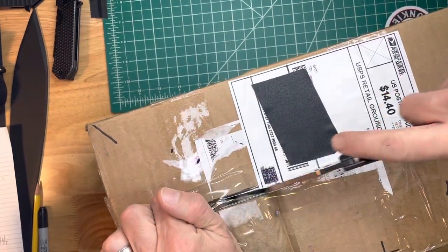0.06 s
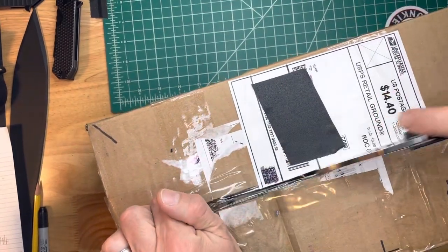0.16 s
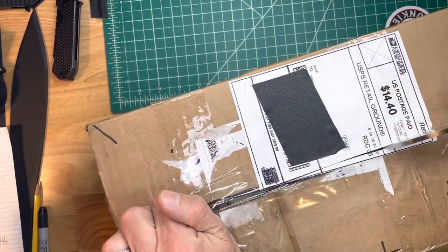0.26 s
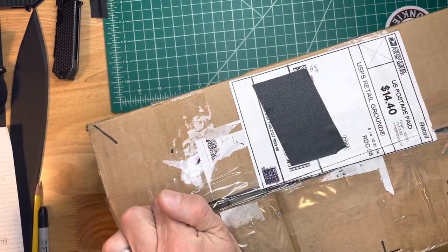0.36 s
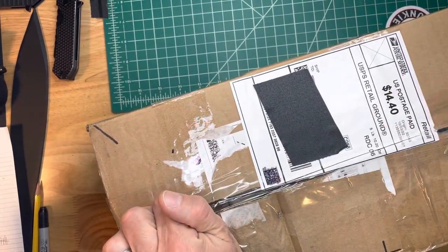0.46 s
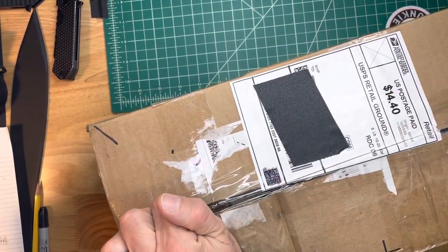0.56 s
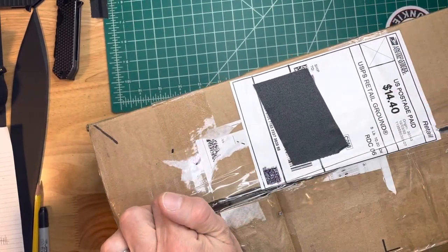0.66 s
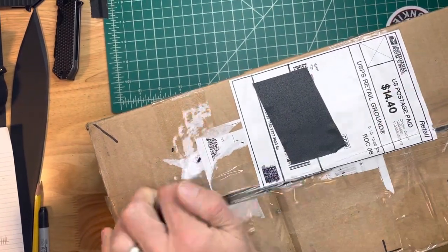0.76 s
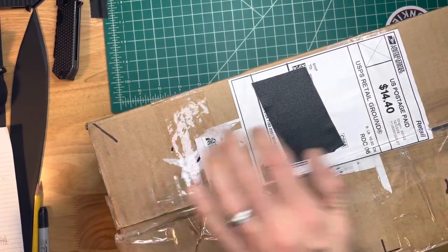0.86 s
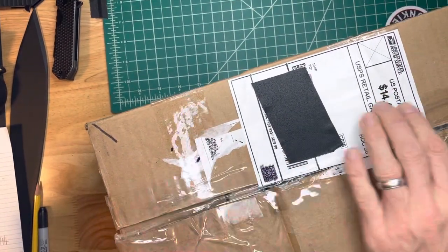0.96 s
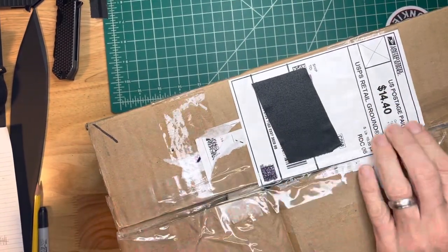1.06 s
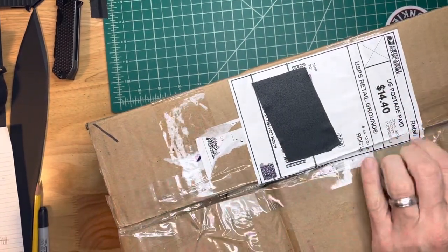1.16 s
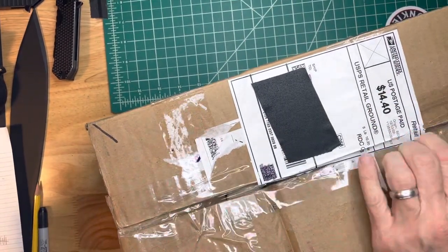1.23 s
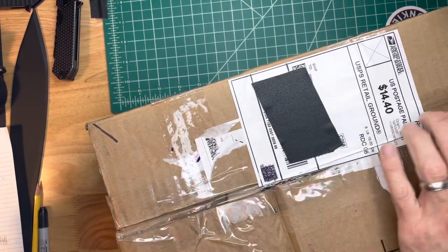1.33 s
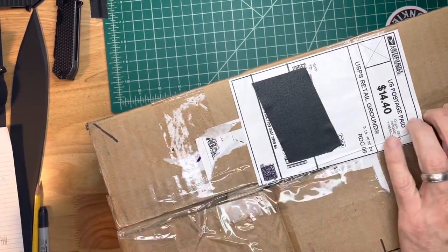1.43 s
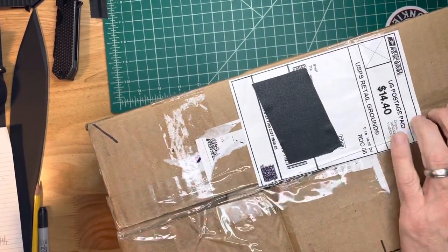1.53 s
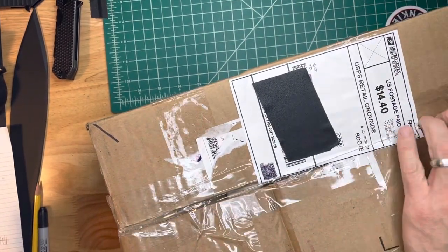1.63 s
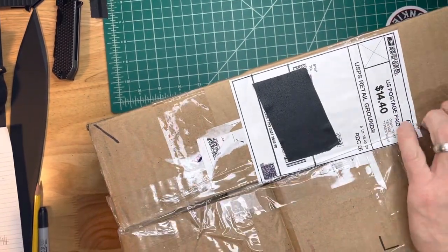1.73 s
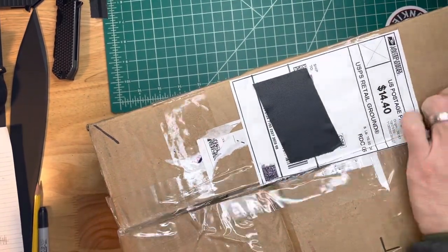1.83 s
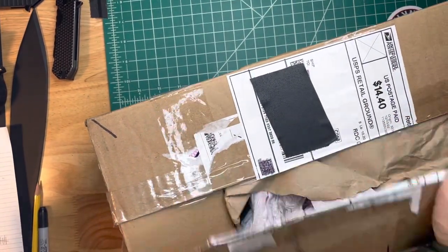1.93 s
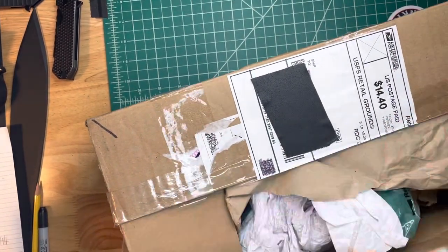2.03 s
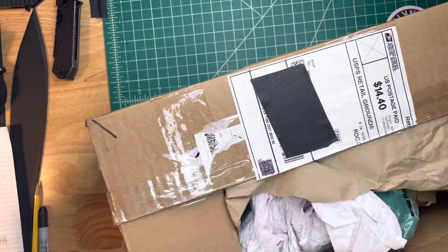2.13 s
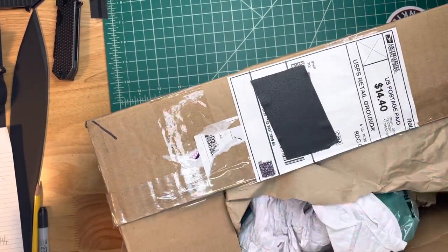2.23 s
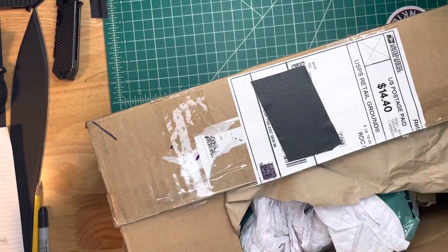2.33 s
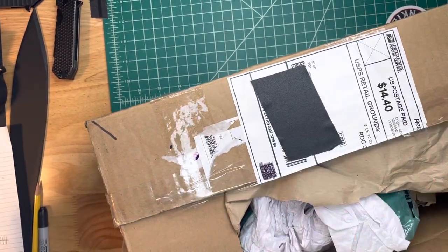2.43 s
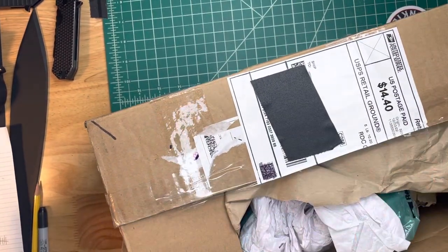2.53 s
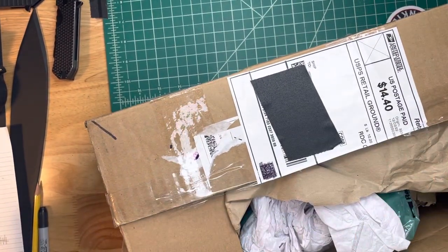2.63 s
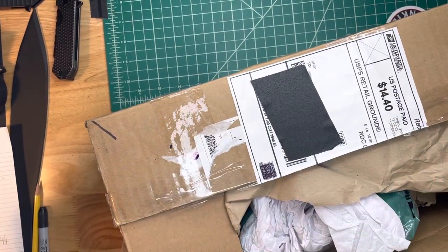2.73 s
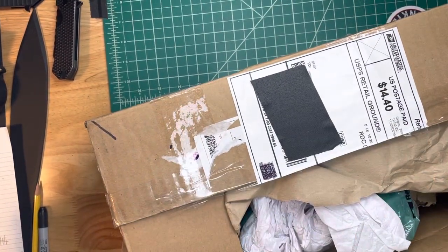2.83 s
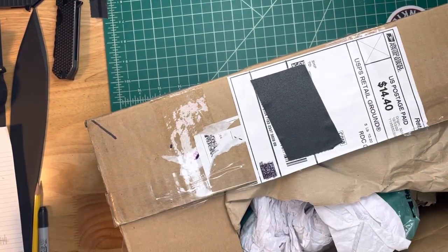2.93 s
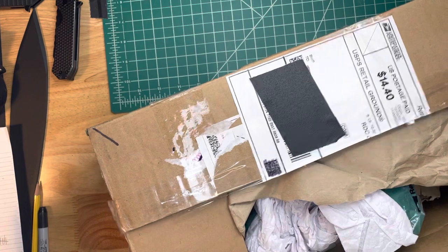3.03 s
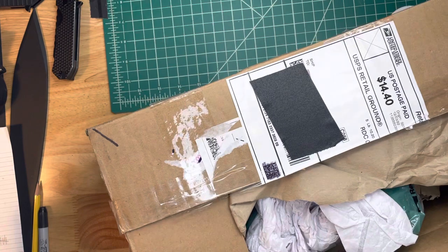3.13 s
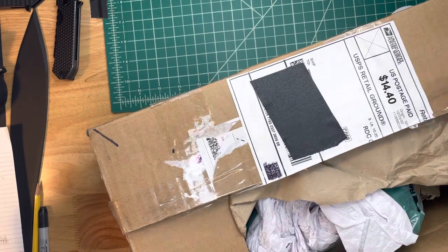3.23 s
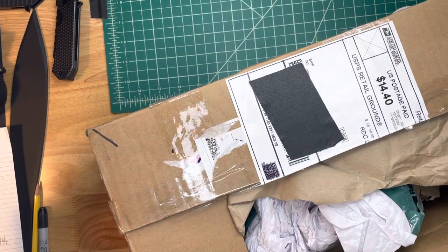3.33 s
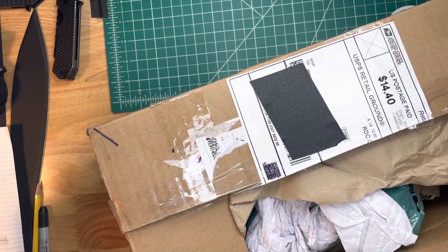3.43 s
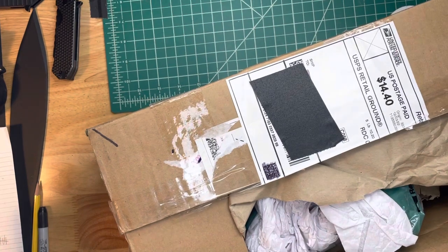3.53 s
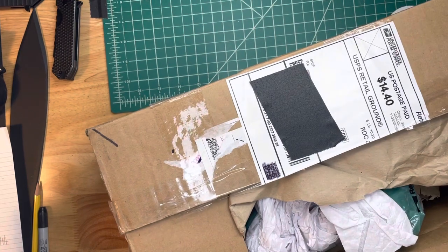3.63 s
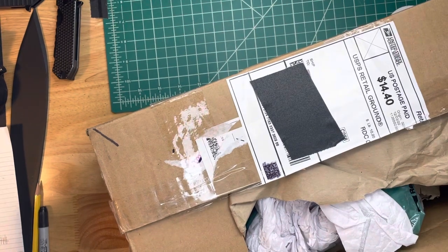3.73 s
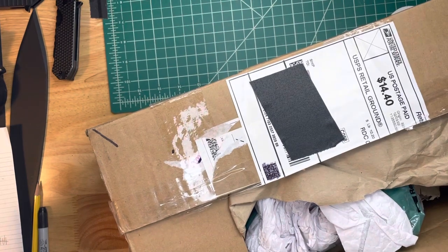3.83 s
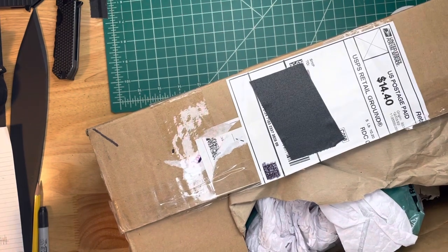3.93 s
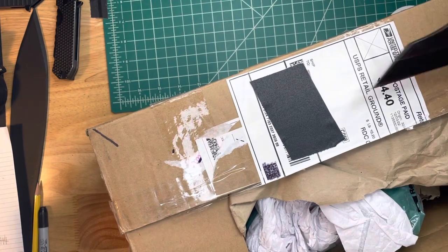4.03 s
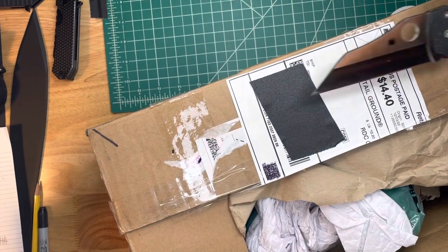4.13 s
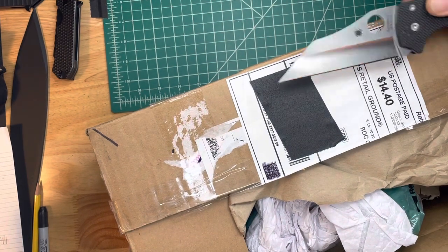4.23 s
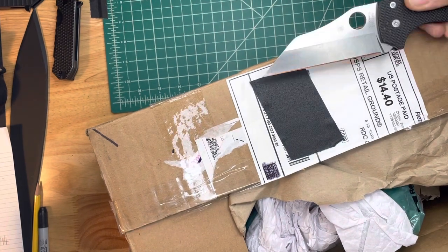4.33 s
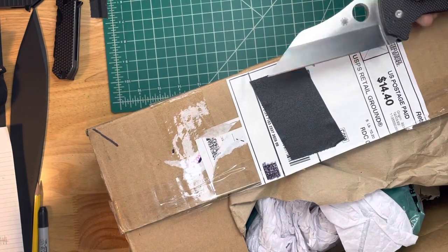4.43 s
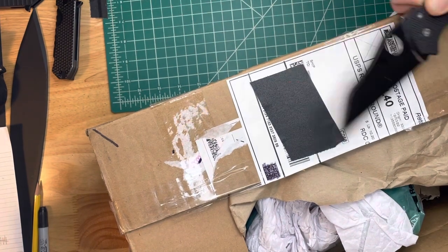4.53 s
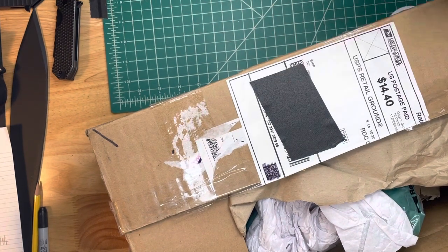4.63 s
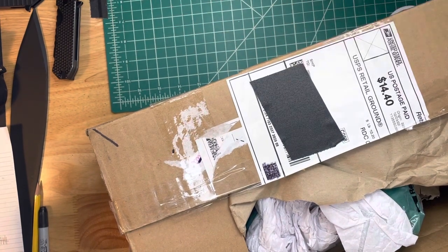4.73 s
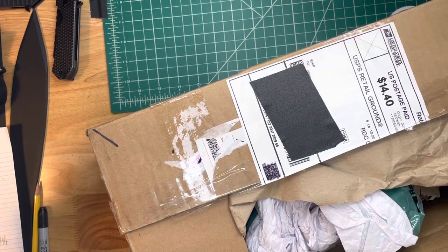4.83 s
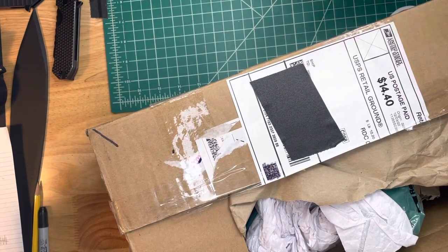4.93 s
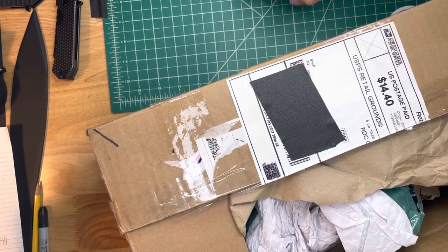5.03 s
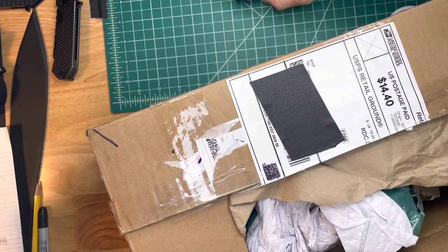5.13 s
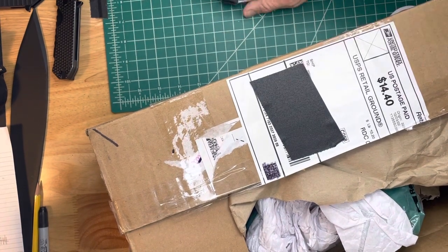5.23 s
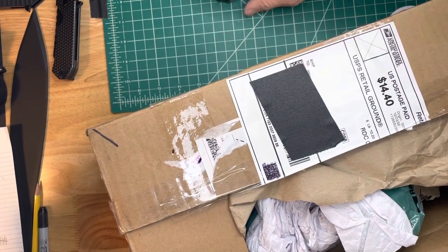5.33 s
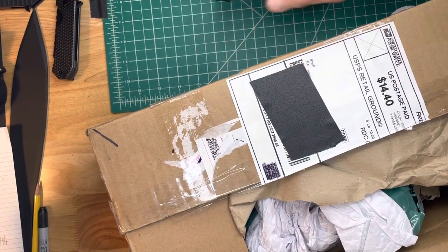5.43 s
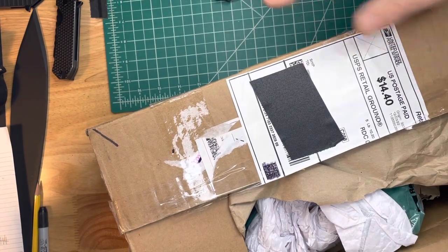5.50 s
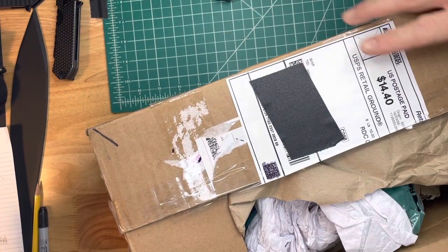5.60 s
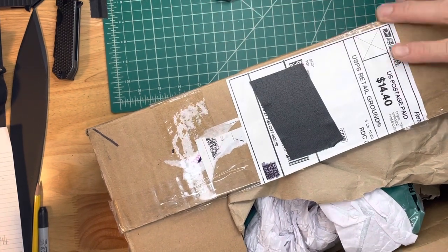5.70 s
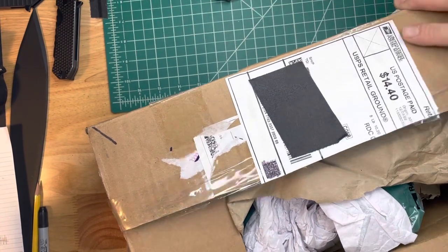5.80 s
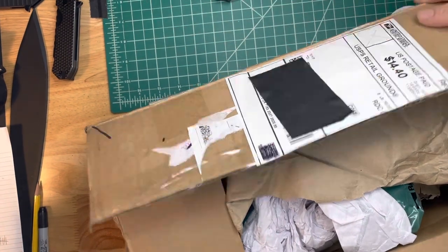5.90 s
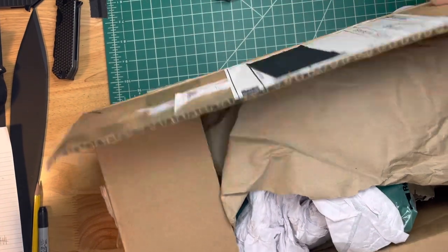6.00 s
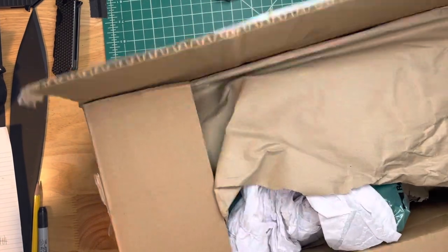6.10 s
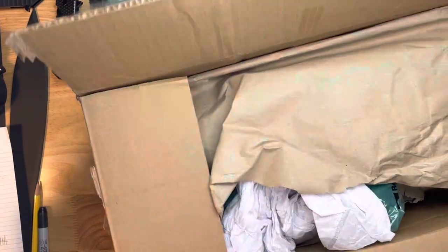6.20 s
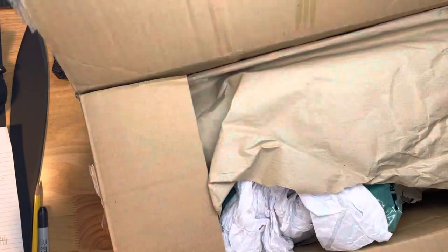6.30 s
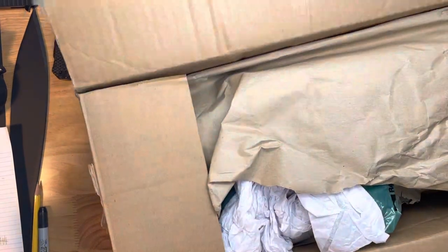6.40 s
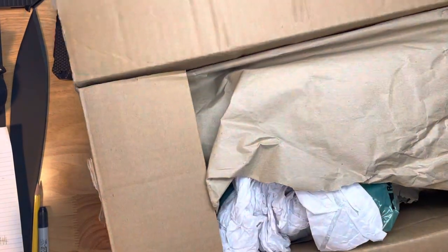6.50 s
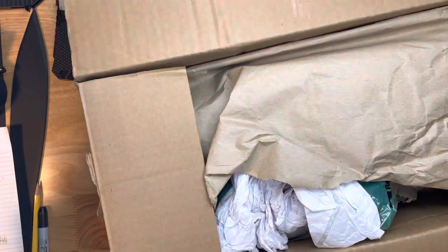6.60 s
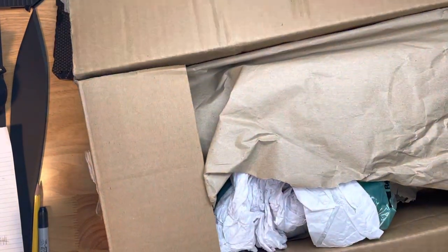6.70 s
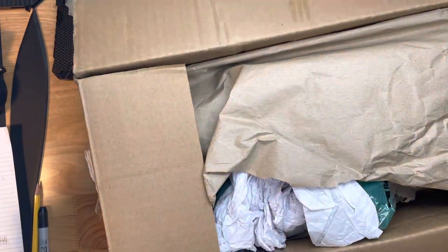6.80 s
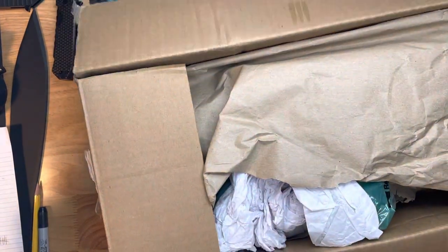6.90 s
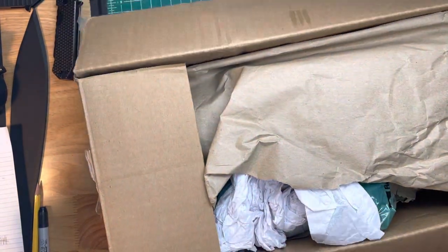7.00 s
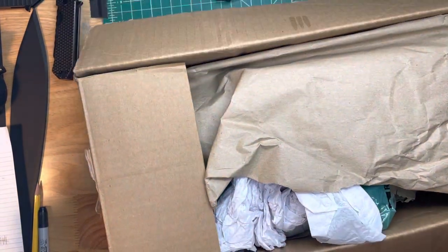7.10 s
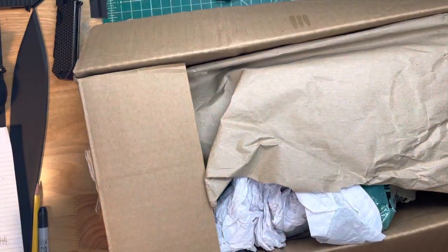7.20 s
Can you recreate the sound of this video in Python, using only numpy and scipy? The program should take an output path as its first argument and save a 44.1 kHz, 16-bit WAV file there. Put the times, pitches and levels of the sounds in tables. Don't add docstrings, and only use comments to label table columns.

```python
import sys
import numpy as np
from scipy import signal
from scipy.fft import rfft, irfft, next_fast_len
from scipy.io import wavfile
from scipy.ndimage import uniform_filter1d, map_coordinates

SR = 44100
rng = np.random.default_rng(int(sys.argv[2]) if len(sys.argv) > 2 else 0)


def int16_out(signal):
    q = np.round(np.clip(np.atleast_2d(signal).T, -1, 1) * 32767)
    wavfile.write(sys.argv[1], SR, q.astype(np.int16))


def field_ratio(decibels):
    return 10 ** (np.asarray(decibels, dtype=float) / 20)


N = 319749


def unit(x):
    return x / np.sqrt(np.mean(x ** 2) + 1e-20)


def along(points, hz):
    f, value = np.transpose(points)
    return np.interp(np.log(hz + 1), np.log(np.abs(f) + 1), value)


def filtered(x, response):
    size = next_fast_len(N + SR // 2)
    hz = np.fft.rfftfreq(size, 1 / SR)
    return irfft(rfft(x, size) * response(hz), size)[..., :N]


def resonant(x, modes):
    def response(f):
        total = 0
        for k, (hz, width, db) in enumerate(modes):
            damping = 1j * f * width
            total = total + (-1) ** k * field_ratio(db) * damping / (hz * hz - f * f + damping)
        return total
    return filtered(x, lambda f: np.interp(f, f[::16], response(f[::16])))


def coloured(x, spectrum):
    low, high = spectrum[0][0], spectrum[-1][0]
    return filtered(x, lambda hz: field_ratio(along(spectrum, hz)) * (hz > low) * (hz < high))


# pitch in Hz, width in Hz, level in dB.
FLAP_MODES = [(401.2, 135, 3.5), (456.5, 153.5, 6), (551, 51.7, 5), (699, 78.4, 3), (883, 60, -2),
              (1050, 46, -10.5)]
# pitch in Hz, level in dB per Hz.
SNAP_EDGE = [(2500, -13.5), (5500, -1), (8000, 0.5), (10000, -7), (15900, -10), (16800, -40)]


def snaps(rows):
    centres, edges, kicks = np.zeros((3, N + SR))
    t = np.arange(SR // 8) / SR
    fade = .12 * field_ratio(-60 * t / .06) + field_ratio(-60 * t / .011)
    release = 1.7 * np.exp(-t / .00008)
    for s, db, knock_db, hz, edge_db in rows:
        fizz = rng.standard_normal((3, len(t))) * fade
        fizz *= np.linalg.norm(fade) / np.linalg.norm(fizz, axis=1, keepdims=True)
        burst = fizz + release
        start = round(s * SR)
        at = slice(start, start + len(t))
        centre = signal.iirpeak(min(hz, 15000), 3.5, SR)
        centres[at] += field_ratio(db + 6.5) * signal.lfilter(*centre, burst[0])
        edges[at] += field_ratio(db + edge_db + 6.5) * burst[1]
        kicks[at] += field_ratio(db + knock_db + 13) * burst[2]
    return centres[:N] + coloured(edges[:N], SNAP_EDGE) + resonant(kicks[:N], FLAP_MODES)


# start in seconds, peak in dB, box knock in dB, centre in Hz, bright edge in dB.
TAPE_SLITS = [(0.009, -17, -1.5, 2130, -10), (0.0753, -15, -9, 1400, -10), (0.141, -19, -5, 3320, -15),
              (0.1945, -14.5, -7, 1820, -12), (0.3424, -26.5, 0, 1780, -1), (0.562, -37.5, -23, 6540, 2.5),
              (0.6295, -29.5, -6, 1340, -7.5), (0.669, -19.5, -6, 1180, -10.5),
              (0.7112, -27.5, -49, 1610, -18), (0.7453, -39, -7.5, 1710, -7.5),
              (0.7609, -21, -13, 1810, -3)]
# start in seconds, peak in dB, box knock in dB, centre in Hz, bright edge in dB.
TAPE_TEARS = [(0.962, -35.5, -1, 1510, -8), (1.101, -32.5, -1, 2330, -4), (1.1361, -5, -18, 1100, -21.5),
              (1.2516, -34, 0, 2270, -28), (1.302, -28, -1, 1080, -16), (1.331, -26.5, -5, 1210, -15),
              (1.551, -31, 0, 1240, -0.5), (1.6294, -13, -14, 1670, -14), (1.678, -23, 1.5, 1140, -5.5),
              (1.756, -19, -9.5, 1745, -6.5), (1.819, -15.5, -7.5, 1552, -11.5),
              (1.8569, -12, -2, 1685, -4), (1.8711, 2, -4, 1650, -15.5), (1.8975, -7.5, -8, 1810, -8.5)]
# start in seconds, peak in dB, box knock in dB, centre in Hz, bright edge in dB.
PAPER_CREASES = [(2.2269, -30.5, -22, 2030, -18.5), (2.4697, -36.5, -2.5, 2330, -11.5),
                 (2.61, -40.5, -3, 5060, -1.5), (2.832, -31.5, -13.5, 1190, -16.5),
                 (2.937, -34, -13.5, 5960, -20.5), (3.1831, -30.5, -10.5, 2350, -4),
                 (3.190, -24.5, 5, 1110, -11.5), (3.252, -10, 1, 1210, -9), (3.406, -23.5, 4.5, 2210, -15),
                 (3.4286, -18.5, 7, 1730, -9.5), (3.457, -34.5, -12.5, 1755, 3)]
# start in seconds, peak in dB, box knock in dB, centre in Hz, bright edge in dB.
KNIFE_AND_FLAP_CLICKS = [(4.145, -34, -14, 5850, 0), (4.4793, -26.5, -1, 1990, -2),
                         (4.5102, -33.5, 5, 1740, -20), (4.5606, -35, 6.5, 10200, -4),
                         (4.66, -17.5, -32, 3300, 4), (5.084, -28.5, -8, 1240, -50),
                         (5.2289, -22.5, 4.5, 1700, -6.5), (5.2697, -24, 0, 1170, -7),
                         (5.2979, -4.5, -9, 1300, -19), (5.3359, -6.5, -30, 1240, -20),
                         (5.395, -20, -11, 1130, -14.5), (5.673, -27, 1, 5300, -30),
                         (5.8488, -27, -2.5, 2200, -5), (5.874, -7.5, -6.5, 2070, -8),
                         (6.1562, -41, -25, 6100, -0.5)]


def tape_paper_and_knife():
    return snaps(TAPE_SLITS + TAPE_TEARS + PAPER_CREASES + KNIFE_AND_FLAP_CLICKS)


# start in
# seconds, peak in dB, box knock in dB, centre in Hz, bright edge in dB.
SMALL_TICKS = [(0.0323, -18, -4, 1510, -9), (0.3212, -33.5, -16, 1700, -8), (0.3584, -28, -12, 1250, -3.5),
               (0.415, -24, -12, 1440, -6.5), (0.5004, -38, -14, 2190, -9.5),
               (0.5726, -31.5, -18, 1210, -3.5), (0.634, -25, -10, 2150, -12.5),
               (0.9722, -23, -13, 1410, -16), (0.9921, -36, -9, 1770, -7.5), (1.2724, -32, -24, 1860, -7),
               (1.707, -29, -8, 1250, -10), (1.8135, -23.5, -11, 5600, -6), (2.1326, -33.5, 1.5, 1890, -12),
               (2.9604, -31, -14.5, 1210, -11.5), (2.9915, -24.5, -5, 2350, -13),
               (3.1966, -18.5, -17, 2300, -11.5), (4.6563, -15, -16, 5430, -1),
               (4.6724, -24, -15, 5830, -6.5), (4.9097, -44, -12, 1220, 0), (5.0764, -43, -6, 1230, -16.5),
               (5.3594, -27.5, -14, 1200, -8.5), (6.1032, -52.5, -30, 11000, -5),
               (6.2447, -48, -20, 1510, -12), (6.4124, -39.5, -4, 2060, -7), (6.9366, -41.5, -10, 1220, -7),
               (7.0744, -34, -12, 1720, -15), (7.1322, -37.5, -14, 3500, -31),
               (.278, -34.5, -30, 9000, 1),
    (.31, -40, -30, 9000, -3),
    (1.862, -24, -29.5, 5200, -6),
    (3.0812, -35, -30, 1500, -30.5),
    (4.5254, -32, 10, 4600, -8),
    (5.2742, -30.5, -20, 5600, -9.5),
    (5.3014, -18, -30, 5740, -9.5),
    (5.3294, -30.5, -20, 5400, -7),
    (6.4154, -42.5, -30, 8300, 1),
    (6.4474, -55, -30, 8000, 0.5),
]


def small_ticks():
    return field_ratio(-1.5) * snaps(SMALL_TICKS)


# pitch in Hz, width in Hz, level in dB.
PANEL_MODES = [(153.5, 22, 1), (247.1, 20.8, 2.5), (312.3, 59.5, -4.5), (395, 46, -2.5)]
# start in seconds, peak in dB, pitch in Hz, rattle in dB.
SOFT_BLOWS = [(0.271, -14, 292, -5), (0.444, -8, 365, 0.5), (0.669, -11.5, 385, 11), (0.966, -17, 144, -10),
              (1.138, -22, 101, 12), (1.41, -23.5, 67.7, 6.5), (1.632, -18, 280, -17),
              (1.774, -17.5, 255, 8), (1.865, -9.5, 164, -18.5), (1.882, -14, 72.4, -4),
              (1.913, -37, 83.4, -9), (2.838, -9, 163, -7), (2.975, -3.5, 180, -27), (3.178, -8, 185, 7),
              (3.2599, -1, 195, -13.5), (3.462, -17, 166, -14), (4.515, -28.5, 101, 4),
              (4.557, -29.5, 67.7, -3), (5.233, -30.5, 248, 13.5), (5.289, -40, 249.6, -20),
              (5.398, -42, 82.4, -16), (5.881, -0.5, 380.3, -15.5), (5.891, -10.5, 260, -24),
              (6.25, -30, 85, -1.5), (6.329, -28, 104, -6), (6.518, -27.5, 111, -8), (6.607, -31, 83, 4.5),
              (6.913, -37, 255, 4), (6.995, -33, 122, 10.5)]


def thumps():
    bends, puffs = np.zeros((2, N + SR))
    t = np.arange(SR // 3) / SR
    for s, db, hz, rattle_db in SOFT_BLOWS:
        start = round(s * SR)
        cycles = hz * t
        turn = 2 * np.pi * (.85 * cycles + 0.22 * (1 - np.exp(-cycles / 0.5)))
        swell = cycles ** 1.8 * np.exp(-cycles / 0.53)
        bends[start:][:len(t)] += field_ratio(db + 12.0) * swell * np.sin(turn)
        rattle = field_ratio(db + rattle_db + 13.5 - 60 * t / 0.029)
        puffs[start:][:len(t)] += rattle * rng.standard_normal(len(t))
    return bends[:N] + resonant(puffs[:N], PANEL_MODES)


# start in seconds, peak in dB,
# pitch in Hz, time to fall 60 dB in seconds.
BODY_RINGS = [(.009, -19, 730, 0.049), (0.031, -19, 300, .1), (.11, -23, 1010, .04),
              (.14, -20.5, 1050, 0.032), (0.194, -22.5, 1015, 0.03), (.243, -25, 300, .06),
              (.352, -21.5, 775, 0.06), (.395, -26.5, 764, 0.18), (0.423, -8, 301, 0.043),
              (.556, -29.5, 770, 0.039), (0.599, -23, 266, 0.16), (0.626, -20, 315, 0.13),
              (.676, -27, 1110, 0.034), (1.136, -26, 740, 0.041), (1.175, -23, 717, 0.05),
              (1.208, -30, 586, 0.032), (1.301, -22, 740, 0.026), (1.414, -34.5, 760, 0.048),
              (1.534, -28, 265.5, 0.12), (1.639, -22, 95, .12), (1.668, -19.5, 338, 0.059),
              (3.412, -22.5, 516, 0.086), (5.8735, -10.5, 2130, 0.015), (1.869, -14, 843, 0.12),
              (1.9, -26, 81, 0.094), (2.99, -13.5, 738, 0.029), (3.031, -28, 715, 0.036),
              (3.089, -26, 338, 0.075), (3.1, -18, 465, 0.12), (3.27, -16.5, 244, 0.24),
              (3.27, -22, 69.4, 0.18), (3.35, -32, 660, 0.052), (3.429, -16, 678, 0.052),
              (3.5, -34.5, 244.7, 0.18), (3.72, -51, 252, 0.29), (3.929, -49.5, 255, 0.2),
              (4.145, -50.5, 558, 0.19), (4.31, -52, 75.3, 0.27), (5.084, -32, 1242, 0.12),
              (5.17, -39, 940, 0.048), (5.205, -38, 1220, 0.037), (5.229, -31.5, 3010, .05),
              (5.229, -36, 1700, 0.048), (5.296, -19.5, 1231, 0.062), (5.884, -22, 241.3, 0.23),
              (5.885, -11.5, 329, 0.074), (5.886, -27, 489, 0.21), (5.892, -11, 57.6, 0.087),
              (6.356, -41, 2090, 0.065), (6.856, -45, 2670, 0.036),
              (2.9912, -23, 840, .031),
    (3.0962, -42, 2270, 0.1),
    (3.1182, -36.5, 2230, 0.083),
    (4.4822, -35, 800, 0.018),
    (4.5112, -38, 663, 0.062),
    (4.5602, -32.5, 620, .041),
    (5.8762, -14.5, 563, 0.028),
]


def rings():
    out = np.zeros(N + SR)
    t = np.arange(SR // 2) / SR
    for s, db, hz, t60 in BODY_RINGS:
        rise = 1 - np.exp(-hz * t / 0.73)
        out[round(s * SR):][:len(t)] += field_ratio(db - 60 * t / t60) * rise * np.sin(2 * np.pi * hz * t)
    return out[:N]


# start in seconds, peak in dB, last pitch in Hz.
FLAP_POPS = [(.197, -50, 304), (1.14, -26.5, 132), (1.631, -18, 189), (1.757, -22.5, 282),
             (1.774, -20, 221.7), (1.848, -18.5, 323), (1.861, -13, 403), (1.875, -18, 150.3),
             (5.229, -44, 338), (5.298, -28, 340), (5.397, -29, 241), (6.913, -37, 400), (6.998, -39, 340)]


def pops():
    out = np.zeros(N + SR)
    t = np.arange(SR // 2) / SR
    sweep, fall_s, life_cycles = 2.5, .003, 0.87
    for s, db, hz in FLAP_POPS:
        cycles = hz * (t + sweep * fall_s * (1 - np.exp(-t / fall_s)))
        life = hz * t / life_cycles
        out[round(s * SR):][:len(t)] += field_ratio(db) * np.e * life * np.exp(-life) * np.sin(2 * np.pi * cycles)
    return out[:N]


LAG_S = .008


def strokes(rows, rise_db_per_s, fall_db_per_s):
    t = np.arange(0, N + 64, 64) / SR - LAG_S
    s, hold, db = np.transpose(rows)[:3, :, None]
    rise = rise_db_per_s / (1 + (hold / .06) ** 2)
    before = np.maximum(s - t, 0)
    after = np.maximum(t - s - np.abs(hold), 0)
    return field_ratio(db - rise * before - fall_db_per_s * after)


def played(steady_db, curve, shapes, over_db):
    quick = np.sqrt(np.sum((shapes * field_ratio(over_db)[:, None]) ** 2, axis=0))
    quick = np.interp(np.arange(N), np.arange(len(quick)) * 64, quick)
    slow = field_ratio(np.interp(np.arange(N) / SR - LAG_S, np.transpose(curve)[0], steady_db))
    return np.hypot(slow, quick)


# time in seconds, pressure in dB, heft in dB (toward the desk, away from the flaps).
HAND_GRIP = [(0, -34.5, -7), (.66, -30, -5), (.74, -41, -1.5), (.92, -64, -8), (1.1, -45, -13),
             (1.5, -49, -7.5), (1.85, -48, -14), (2.3, -44.5, -10), (2.761, -67.5, -6), (3.601, -63, -7),
             (4.3, -64.5, -15), (4.55, -45.5, -13.5), (4.74, -63.5, -3.5), (4.86, -50, -4.5),
             (5.249, -57, -17.5), (5.52, -51.5, -6), (6.47, -50.5, -18.5), (7.25, -49.5, -12)]
# start in seconds,
# hold in seconds, panel level in dB, desk over it in dB, flaps over it in dB.
BOX_SHOVES = [(0, 0.053, -27, 0.5, -26), (0.355, 0.033, -25, -1, -6.5), (0.39, 0.046, -26, -15, -11),
              (0.583, 0.073, -30.5, -49, -28), (0.968, 0.015, -37.5, 7, 0), (1.133, 0.013, -37.5, 3, 6.5),
              (1.269, 0.071, -39.5, 2, -27), (1.354, 0.043, -51.5, 18, -8),
              (1.621, 0.0087, -26, -10.5, -10), (1.778, 0.013, -29, -3, -5),
              (1.863, 0.019, -10.5, -2.5, -5.5),
              (2.838, 0.038, -40, 4, -9), (2.95, 0.021, -20, 0, -4), (3, 0.12, -36, 0, -9),
               (3.081, 0.044, -20.5, -21.5, -17.5), (3.2, 0.044, -21, -21, 8),
               (3.253, 0.0044, -16, 3.5, -26), (3.31, 0.045, -37, -8, -0.5),
               (3.422, 0.042, -28.5, -2.5, -10), (3.93, 0.053, -57.5, -7, 1), (4.31, 0.035, -57, 4.5, 3),
               (4.9, 0.026, -51.5, 5, 4), (5.078, 0.011, -37, -3, -19.5), (5.29, 0.073, -28.5, -8.5, -1.5),
               (5.4, 0.0067, -32.5, 3.5, -4), (5.677, 0.017, -33, -5, -3), (5.881, 0.012, -29, 4, -7),
               (6.252, 0.01, -57, 17.5, -17), (6.53, 0.0077, -46.5, 5, 5), (6.929, 0.0058, -51, 9, 8),
               (6.995, 0.063, -51.5, 4, 6)]


def box_gains():
    shoves = np.array(BOX_SHOVES)
    _, press_db, heft_db = np.transpose(HAND_GRIP)
    desk_db, flap_db = shoves[:, -2], shoves[:, -1]
    heavy = strokes(shoves, 1100, 270)
    light = strokes(shoves, 1100, 420)
    shake = played(press_db + 3.5 + heft_db, HAND_GRIP, heavy, desk_db)
    drum = played(press_db, HAND_GRIP, heavy, 0 * desk_db)
    rub = played(press_db - 12 - heft_db, HAND_GRIP, light, flap_db)
    return shake, drum, rub


# time in seconds, motion in dB, dull over crisp in dB.
PAPER_STIR = [(0, -68, -6), (.3, -52, -12), (.76, -53.5, 5), (.94, -62.5, -9), (1.3, -53.5, -0.5),
              (1.51, -58, -2), (1.84, -42, 1.5), (2, -56, 0), (2.29, -50, -1), (2.8, -73.5, 4.5),
              (3.651, -68.5, -2.5), (4.199, -61.5, -10), (4.569, -45, -3), (4.64, -65, -12.5),
              (5.2, -51.5, 1), (5.6, -61.5, 2), (6.2, -72, 9), (7.12, -63, 8)]
# start in seconds, hold in seconds, crisp level in dB, dull over crisp in dB.
PAPER_CRUMPLES = [(.01, 0.04, -32, 0), (0.084, 0.069, -38, 3), (0.222, 0.043, -43, -2),
                  (0.444, 0.079, -43.5, 0), (0.19, 0.0045, -34.5, 0.5), (0.333, 0.021, -39.5, 0.5),
                  (0.389, 0.04, -35, -5.5), (0.577, 0.086, -45.5, 1.5), (0.761, 0.0042, -43.5, -5),
                  (0.971, 0.038, -50.5, 0), (1.073, .005, -48.5, -2), (1.129, 0.0038, -36.5, 6),
                  (1.254, 0.024, -49, 6.5), (1.524, 0.045, -46.5, 2.5), (1.62, 0.0048, -40.5, 6.5),
                  (1.851, 0.026, -27, 5), (2.88, 0.16, -48, -7.5), (2.935, 0.054, -38.5, -0.5),
                  (3.031, 0.094, -42.5, -4.5), (3.179, 0.09, -39.5, -1), (3.296, 0.066, -50, 4),
                  (3.398, 0.064, -42, -1.5), (3.782, 0.23, -56.5, -7.5), (4.137, 0.0093, -55.5, -2.5),
                  (4.649, 0.0035, -26, -15), (5.069, 0.0062, -68, 29), (5.222, 0.0075, -46.5, 4.5),
                  (5.287, 0.0024, -34.5, 3.5), (5.323, 0.012, -36.5, 8), (5.661, 0.036, -42.5, -0.5),
                  (5.867, 0.0041, -32.5, 0), (6.357, 0.093, -55.5, 6), (7.164, 0.089, -51.5, -8),
                  (6.441, 0.62, -47, -3.5)]


def paper_gains():
    shapes = strokes(PAPER_CRUMPLES, 2200, 330)
    _, stir_db, dull_db = np.transpose(PAPER_STIR)
    soft_db = np.transpose(PAPER_CRUMPLES)[-1]
    crisp = played(stir_db, PAPER_STIR, shapes, 0 * soft_db)
    dull = played(stir_db + dull_db, PAPER_STIR, shapes, soft_db)
    return crisp, dull


def slips(rate, life, smooth, clump_db):
    sizes = field_ratio(3 * np.minimum(rng.exponential(size=N), 2.5))
    starts = (rng.random(N) < rate / SR) * sizes
    bursts = signal.lfilter([1], [1, -np.exp(-1 / (life * SR))], starts)
    clumps = map_coordinates(rng.standard_normal(300), [np.linspace(0, 299, N)])
    return field_ratio(clump_db * clumps) * (unit(bursts) + smooth) * rng.standard_normal(N)


def patchy(x, depth_db):
    z = signal.stft(x, nperseg=512)[2]
    field = uniform_filter1d(rng.standard_normal(z.shape), 2, axis=0)
    field = uniform_filter1d(field, 6, axis=1)
    return signal.istft(z * field_ratio(depth_db * unit(field)), nperseg=512)[1][:N]


# pitch in Hz, width in Hz, level in dB.
DESK_MODES = [(61.5, 23, -1), (103, 16, 1)]
# pitch in Hz, level in dB per Hz.
CRISP_PAPER = [(2000, -12), (2800, -6), (4000, -3.5), (5500, -1), (8000, -0.5), (10000, -6.5), (12500, -11),
               (15850, -6.5), (16500, -44)]
# pitch in Hz, level in dB per Hz.
DULL_PAPER = [(700, -15), (1000, 0), (1235, -0.5), (1400, -4), (1690, -2.5), (2200, -3.5), (2700, -16),
              (4000, -29)]


def handling():
    shake, drum, rub = box_gains()
    crisp, dull = paper_gains()
    drag = slips(rate=60, life=.004, smooth=2.6, clump_db=.8)
    box = shake * unit(resonant(drag, DESK_MODES))
    box += drum * unit(resonant(drag, PANEL_MODES))
    box += rub * unit(resonant(drag, FLAP_MODES))
    grains = patchy(slips(rate=150, life=.0015, smooth=2.1, clump_db=1.1), depth_db=3)
    paper = crisp * unit(coloured(grains, CRISP_PAPER)) + dull * unit(coloured(grains, DULL_PAPER))
    return field_ratio(-3.0) * box + field_ratio(-2.0) * paper


# pitch in Hz, time to fall 60 dB in seconds.
ROOM_DECAY = [(100, 0.57), (1000, 0.024), (10000, 0.073)]


def room(x):
    hz, t, z = signal.stft(rng.standard_normal(SR // 2), SR, nperseg=256)
    decay = field_ratio(-60 * t / along(ROOM_DECAY, hz)[:, None])
    tail = signal.istft(z * decay, SR, nperseg=256)[1]
    delayed = np.pad(x, (150, 0))
    return signal.fftconvolve(delayed, tail / np.linalg.norm(tail))[:N]


# pitch in Hz, level in dB per Hz.
ROOM_HUSH = [(18, -39.5), (30, 19.5), (125, 11.5), (455, -19), (1800, -31.5), (3210, -18), (5890, -13),
             (7470, -5.5), (11400, -28), (16500, -43.5)]


def hush():
    return field_ratio(-65) * unit(coloured(rng.standard_normal(N), ROOM_HUSH))


# pitch in Hz, likeness from 0 to 1.
LIKENESS = [(60, .9998), (300, .995), (700, .95), (1500, .84), (3000, .76), (5000, .8), (7000, .94),
            (15000, .95)]
# pitch in Hz, lead in radians.
LEFT_LEAD = [(0, 0), (150, -.05), (1030, -.4), (1800, 0), (4130, .8), (5100, .1), (5800, .8), (6900, 2.7),
             (8500, 3.6), (9700, 5.7), (11900, 6.8), (13100, 8.9), (15100, 9.9), (15500, 10.2), (16700, 11)]
# pitch in Hz, left over right in dB.
LEFT_TILT = [(60, .5), (200, 2.5), (380, 4), (700, 3), (1290, 1), (2380, 0)]


def two_microphones(x):
    z = signal.stft(x, nperseg=256)[2]
    scatter = np.exp(2j * np.pi * rng.random(z.shape))
    other = signal.istft(z * scatter, nperseg=256)[1][:N] * np.sqrt(2)

    def shares(hz):
        angle = np.arccos(along(LIKENESS, hz)) / 2
        return np.array([np.cos(angle), np.sin(angle)])

    def left_and_right(hz):
        half = field_ratio(along(LEFT_TILT, hz) / 2) * np.exp(.5j * along(LEFT_LEAD, hz))
        return np.array([half, 1 / half])

    mid, side = filtered(np.array([x, other]), shares)
    return filtered(np.array([mid + side, mid - side]), left_and_right)


def scene():
    hits = tape_paper_and_knife() + thumps() + rings() + pops()
    desk = hits + field_ratio(-18.5) * room(hits) + handling() + hush() + small_ticks()
    bass_cut = signal.butter(2, 50, "high", fs=SR, output="sos")
    return two_microphones(signal.sosfilt(bass_cut, desk))


def low_pass(x):
    return signal.sosfilt(signal.butter(12, 17170, fs=SR, output="sos"), x)


def record(dry):
    mix = dry / (1 + np.abs(dry / .95) ** 4) ** (1 / 4)
    return low_pass(mix)


dry = scene()
out = record(dry)
int16_out(out)
```